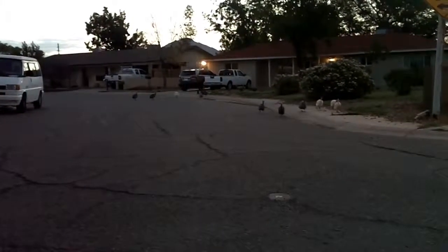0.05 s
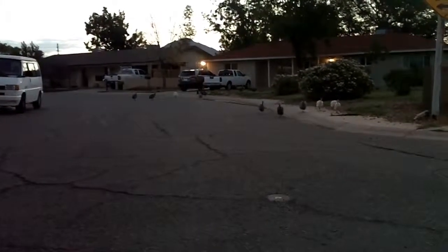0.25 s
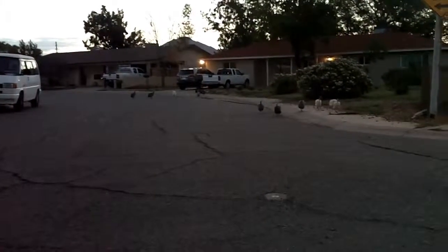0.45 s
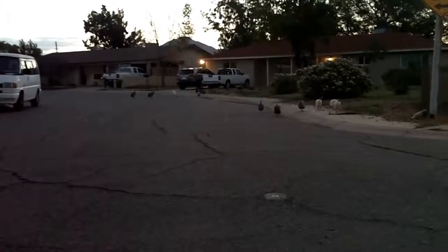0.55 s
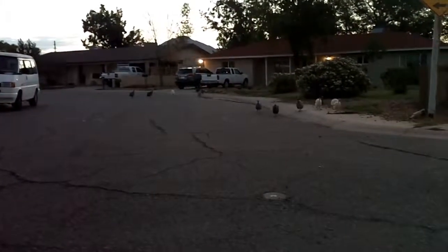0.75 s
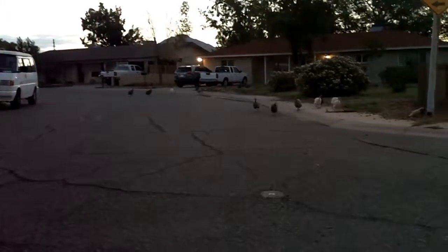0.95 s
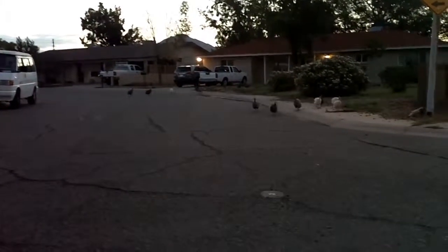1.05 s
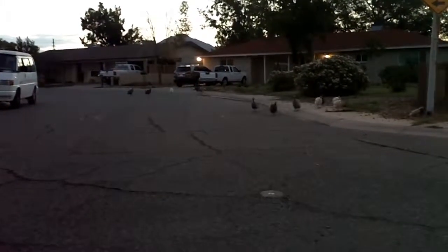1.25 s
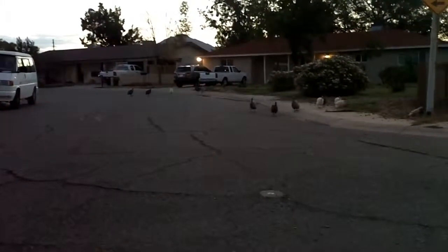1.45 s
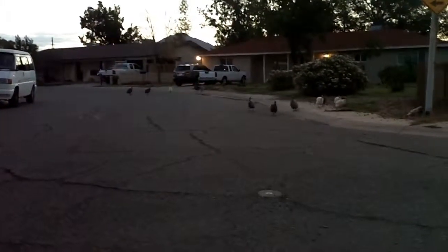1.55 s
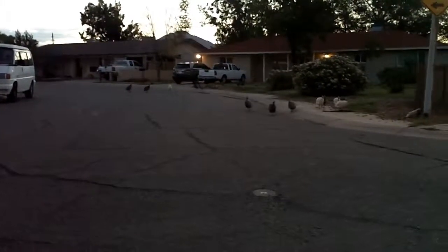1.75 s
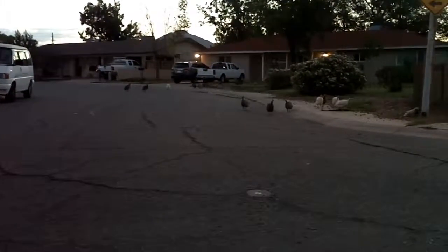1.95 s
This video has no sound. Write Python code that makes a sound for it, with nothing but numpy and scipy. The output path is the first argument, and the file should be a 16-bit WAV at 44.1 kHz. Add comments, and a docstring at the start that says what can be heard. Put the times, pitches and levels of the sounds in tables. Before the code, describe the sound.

Short, high guinea fowl peeps and thin chirps over a faint distant engine hum.

```python
"""Distant town noise and an idling engine hum along a quiet residential street.
Guinea fowl give short high peeps with a strong third harmonic and a raspy onset.
Thin chirps and one hoarse rattle slide between the peeps; house fronts throw back a faint echo.
Air rumbles on the microphone, with a brief high rustle at the start and a few handling knocks later."""
import sys
import numpy as np
from scipy import signal
from scipy.fft import rfft, irfft
from scipy.io import wavfile

SR = 44100
rng = np.random.default_rng(int(sys.argv[2]) if len(sys.argv) > 2 else 0)


def transcribe(u):
    """Save the signal u as a 16-bit wav file named by the first command-line argument.

    u: samples, shape (n,) or (channels, n), limited to [-1, 1]; the rate is SR.
    q: integer samples, one column per channel.
    """
    v = np.clip(np.atleast_2d(u).T, -1, 1)
    q = np.round(v * 32767).astype(np.int16)
    wavfile.write(sys.argv[1], SR, q)


N = 88420


def undb(db):
    return 10 ** (np.asarray(db) / 20)


def wander(cutoff_hz):
    """Smooth random drift, rms 1."""
    rolloff = np.sqrt(1 + (np.fft.rfftfreq(N, 1 / SR) / cutoff_hz) ** 6)
    drift = irfft(rfft(rng.standard_normal(N)) / rolloff, N)
    return drift / drift.std()


def noise(spectrum):
    """Noise shaped by (f/Hz, relative density/dB) points, rms 1."""
    hz, db = np.array(spectrum, float).T
    gain = undb(np.interp(np.log(np.fft.rfftfreq(N, 1 / SR) + 1), np.log(hz), db))
    shaped = irfft(rfft(rng.standard_normal(N)) * gain, N)
    return shaped / shaped.std()


def ramp(u):
    """Smooth step from 0 to 1."""
    return np.sin(np.pi / 2 * np.clip(u, 0, 1)) ** 2


def phase_of(hz):
    return 2 * np.pi * np.cumsum(hz) / SR


# town spectrum: f/Hz, relative density/dB
TOWN_SPECTRUM = [(24, 3.5), (60, -1.5), (110, -2), (200, -3), (300, -12.5), (450, -14.5), (620, -15.5),
                 (800, -23.5), (950, -14), (1060, -21), (1170, -16), (1420, -26), (1670, -21.5),
                 (1970, -29), (2250, -23.5), (2720, -42), (3000, -28.5), (3450, -22), (4200, -22.5),
                 (4850, -26.5), (5500, -40), (6200, -42.5), (7000, -46), (7800, -59), (8900, -48.5),
                 (10300, -52), (12000, -58)]


def town(level_db=-42.5, waver_db=0.5):
    """Far town noise, nearly steady."""
    return noise(TOWN_SPECTRUM) * undb(level_db + waver_db * wander(6.3))


# engine harmonics: multiple of firing rate, rms level/dB
ENGINE_HARMONICS = [(1, -45), (2, -49.5), (3, -54), (4, -63), (5, -60.5)]


def engine(firing_hz=47.12, waver=0.0045):
    """A distant idling engine hums at multiples of its firing rate."""
    phase = phase_of(firing_hz * (1 + waver * wander(2.9)))
    return sum(np.sqrt(2) * undb(db) * np.sin(round(k) * phase + rng.uniform(0, 2 * np.pi))
               for k, db in ENGINE_HARMONICS)


# air spectrum: f/Hz, relative density/dB
AIR_SPECTRUM = [(15, -12.5), (35, 0), (100, -4), (200, -8), (350, -16.5), (700, -23.5), (1400, -32.5),
                (2700, -47), (6000, -71.5)]
# gust envelope: t/s, level/dB
GUST_LEVELS = [(0, -53), (1.05, -51), (1.2, -39.5), (1.29, -40), (1.34, -37), (1.46, -41.5), (1.56, -50.5),
               (1.7, -43.5), (2.0, -66)]


def air(t):
    """Gusts rumble on the microphone."""
    times_s, levels_db = np.array(GUST_LEVELS).T
    return noise(AIR_SPECTRUM) * undb(np.interp(t, times_s, levels_db))


# rustle spectrum: f/Hz, relative density/dB
RUSTLE_SPECTRUM = [(5000, -17), (7900, -12), (8900, 5), (10300, -1), (11600, -19), (12500, -27)]


def rustle(t, level_db=-66.5, end_s=0.085, fade_s=0.098):
    """A faint high rustle that fades at once."""
    return undb(level_db) * noise(RUSTLE_SPECTRUM) * ramp((end_s - t) / fade_s)


# tick and scuff spectra: f/Hz, relative density/dB
TICK_SPECTRUM = [(300, -13), (1500, 1), (2700, -1), (4500, 10), (6200, -5), (7800, -11), (9000, -5.5),
                 (10200, -9), (11200, -24)]
SCUFF_SPECTRUM = [(100, -15), (180, 6), (360, 15), (550, -28), (1200, -42.5)]
# handling knocks: t/s, tick level/dB, thud f/Hz, thud level/dB
HANDLING_KNOCKS = [(1.453, -51, 94, -31), (1.5, -58, 99, -59), (1.540, -53.5, 111, -53),
                   (1.626, -52.5, 200, -31.5)]


def knocks(t, tick_decay_s=0.009, scuff_decay_s=0.02, scuff_re_thud_db=-10.5, thud_peak_s=0.0106):
    """Each knock on the microphone gives a tick, a dull scuff and a soft thud."""
    out, tick, scuff = np.zeros(N), noise(TICK_SPECTRUM), noise(SCUFF_SPECTRUM)
    for start_s, tick_db, thud_hz, thud_db in HANDLING_KNOCKS:
        age_s = np.maximum(t - start_s, 0)
        tick_env = ramp(age_s / 0.00081) * np.exp(-age_s / tick_decay_s)
        scuff_env = ramp(age_s / 0.0048) * np.exp(-age_s / scuff_decay_s)
        thud_env = (age_s / thud_peak_s * np.exp(1 - age_s / thud_peak_s)) ** 2
        out += undb(tick_db) * tick_env * tick
        out += undb(thud_db + scuff_re_thud_db) * scuff_env * scuff
        out += undb(thud_db) * thud_env * np.sin(2 * np.pi * thud_hz * age_s)
    return out


# house-front reflections: delay/s, gain/dB
REFLECTIONS = [(0.023, -28), (0.040, -27.5), (0.059, -32), (0.104, -31.5)]


def street_echo(direct, t, t60_s=0.8, tail_db=-22, blur_hz=160, flicker_db=2):
    """House fronts return a few reflections and a thin diffuse tail, broken and blurred."""
    response = rng.standard_normal(N) * np.exp(-np.log(1000) * t / t60_s) * ramp(t / 0.0042)
    response *= undb(tail_db) / np.linalg.norm(response)
    for delay_s, db in REFLECTIONS:
        response[int(delay_s * SR)] += undb(db)
    echo = signal.fftconvolve(direct, response)[:N]
    blur = 0.35 * (wander(blur_hz) + 1j * wander(blur_hz))
    modulation = (1 + blur) * undb(flicker_db * wander(70))
    modulation /= np.sqrt(np.mean(np.abs(modulation) ** 2))
    return (signal.hilbert(echo) * modulation).real


def rattle(t, start_s=1.056, end_s=1.119, pulse_hz=112, first_hz=4080, last_hz=3495):
    """A distant bird's hoarse run of pulses, sinking in pitch as it grows."""
    level_db, rise_db, jitter = -47, 2.5, 0.06
    age_s, left_s = t - start_s, end_s - t
    progress = np.clip(age_s / (end_s - start_s), 0, 1)
    hz = (first_hz + (last_hz - first_hz) * progress) * (1 + jitter * wander(930))
    gate = ramp(age_s / 0.005) * ramp(left_s / 0.0032)
    pulses = gate * np.abs(np.sin(np.pi * pulse_hz * left_s))
    return undb(level_db + rise_db * progress) * pulses * np.sqrt(2) * np.sin(phase_of(hz))


# bird chirps: t/s, length/s, first f/Hz, middle f/Hz, last f/Hz, level/dB, hoarseness 0-1
BIRD_CHIRPS = [ (0.244, 0.022, 4650, 4940, 4650, -44, 0.4), (0.2527, 0.011, 4700, 4440, 3280, -34, 0.3),
               (0.255, 0.013, 3350, 3324, 3180, -38.5, 0.2), (0.317, 0.018, 3420, 3280, 3180, -48.5, 0.37),
               (0.433, 0.02, 4450, 4850, 4750, -47, 0.54), (0.524, 0.0074, 5840, 6060, 6160, -54.5, 0.2),
               (0.53, 0.032, 4170, 4680, 3600, -42, 0.27), (0.577, 0.028, 4550, 4450, 3830, -50.5, 0.2),
               (0.594, 0.077, 3200, 3080, 3080, -50, 0.17), (0.658, 0.075, 2990, 2860, 2750, -53, 0.2),
               (0.715, 0.088, 3600, 3520, 2900, -58.5, 0.15), (0.840, 0.034, 4250, 4920, 4600, -51.5, 0.25),
               (0.858, 0.048, 3750, 3600, 3400, -51.5, 0.15), (1.038, 0.033, 3600, 4280, 4550, -46, 0.5),
               (1.431, 0.024, 4530, 4210, 4220, -49, 0.5), (1.549, 0.0082, 3700, 3560, 3400, -43.5, 0.5),
               (1.586, 0.032, 4200, 4500, 4650, -50.5, 0.38), (1.615, 0.052, 4500, 4380, 4720, -49, 0.65),
               (1.768, 0.020, 4130, 3630, 2850, -49, 0), (1.784, 0.051, 2930, 2780, 2810, -55, 0.08),
               (1.812, 0.090, 3430, 3230, 3020, -55.5, 0.14), (1.951, 0.020, 4600, 4550, 3230, -38, 0.34), ]


def chirps(t, waver_depth=0.011, flicker_db=0.5, fray_hz=410):
    """Thin quavering whistles, each on one arc; hoarse ones fray into a band around their pitch."""
    out = np.zeros(N)
    waver = 1 + waver_depth * wander(470)
    flicker = undb(flicker_db * wander(98))
    fray = (wander(fray_hz) + 1j * wander(fray_hz)) / np.sqrt(2)
    for start_s, length_s, first_hz, middle_hz, last_hz, db, hoarse in BIRD_CHIRPS:
        progress = np.clip((t - start_s) / length_s, 0, 1)
        arch = 1 - (2 * progress - 1) ** 2
        bend_hz = middle_hz - (first_hz + last_hz) / 2
        hz = first_hz + (last_hz - first_hz) * progress + bend_hz * arch
        voice = (1 - hoarse + hoarse * fray) / np.hypot(1 - hoarse, hoarse)
        whistle = np.imag(voice * np.exp(1j * phase_of(hz * waver)))
        out += undb(db) * ramp(arch / 0.54) * whistle
    return out * flicker


# throat rasp: f/Hz, relative density/dB
THROAT_SPECTRUM = [(1200, -10), (2600, -8), (3300, -9), (4000, 9.5), (4800, 10.5), (5500, -30),
                   (6300, -19.5), (7800, -25.5), (9000, -20.5), (12000, -52.5)]
# peep overtones: harmonic number, level/dB re third harmonic
PEEP_OVERTONES = [(2, -28), (3, 0), (4, -24.5), (5, -43), (6, -44.5)]
# peeps: t/s, length/s, peak effort t/s, first f/Hz, last f/Hz, glide exponent, third harmonic level/dB,
# fundamental level/dB, roughness 0-1, flutter f/Hz, flutter depth, onset overshoot/fraction of pitch
FOWL_PEEPS = [ (0.260, 0.0212, 0.2713, 1669, 1471, 0.75, -22, -34, 0.19, 650, 0.12, 0.0296),
              (0.658, 0.019, 0.6668, 1510, 1292, 0.65, -29.5, -43, 0.22, 500, 0.15, 0.06),
              (1.12, 0.017, 1.128, 1450, 1253, 0.8, -37.5, -49, 0.17, 699, 0.43, 0.1),
              (1.2365, 0.035, 1.2615, 1486, 1336, 4.55, -21.5, -35.5, 0.08, 560, 0.08, 0),
              (1.559, 0.022, 1.570, 1410, 1339, 1.13, -35.5, -49, 0.22, 659, 0.82, 0.0415),
              (1.9263, 0.023, 1.937, 1484, 1485, 1.3, -16.5, -34.5, 0.07, 496, 0.14, 0.12),
              (1.989, 0.032, 2.000, 1520, 1484, 1.5, -44, -42.5, 0.54, 546, 0.27, 0.05), ]


def guinea_fowl(t, attack_s=0.0053, release_s=0.0042, swell_s=0.0066, rasp_hz=775):
    """Falling peeps: effort swells the overtones, a second vibration adds side tones, the onset rasps."""
    rough_decay_s, overshoot_s = 0.014, 0.0038
    out, breath = np.zeros(N), noise(THROAT_SPECTRUM)
    shimmer, jitter = wander(rasp_hz), wander(rasp_hz)
    for (start_s, length_s, peak_s, first_hz, last_hz, exponent, third_db, fundamental_db,
         roughness, flutter_hz, flutter_depth, overshoot) in FOWL_PEEPS:
        age_s = t - start_s
        progress = np.clip(age_s / length_s, 0, 1)
        hz = first_hz + (last_hz - first_hz) * progress ** exponent
        hz *= 1 + overshoot * np.exp(-(age_s / overshoot_s) ** 2)
        rasp = 1.96 * roughness * np.exp(-np.maximum(age_s, 0) / rough_decay_s)
        flutter = flutter_depth * progress * np.sin(2 * np.pi * flutter_hz * age_s + 0.23 * jitter)
        phase = phase_of(hz) + rasp * jitter / np.pi + 0.4 * flutter
        gate = ramp(age_s / attack_s) * ramp((length_s - age_s) / release_s)
        effort = 0.4 + 0.6 * np.exp(-((t - peak_s) / swell_s) ** 2)
        overtones = sum(undb(db) * np.sin(round(k) * phase) for k, db in PEEP_OVERTONES)
        voice = overtones * (1 + flutter + 0.5 * rasp * shimmer) + rasp * breath
        out += gate * undb(third_db) * effort * voice
        out += gate * undb(fundamental_db) * np.sqrt(effort) * np.sin(phase)
    return out


def scene():
    """Birds and their echo over town, engine and microphone noise; mono."""
    t = np.arange(N) / SR
    birds = guinea_fowl(t) + chirps(t) + rattle(t)
    street = birds + street_echo(birds, t) + engine() + town()
    return (street + air(t) + knocks(t) + rustle(t))[None]


# microphone response dips: f/Hz, 1/e half-width/Hz, gain/dB
MIC_DIPS = [(2735, 62, -14.5), (5457, 334, -9.5), (7760, 550, -5.5), (10860, 260, -14.5)]


def record(dry, lowpass_hz=12000):
    """The microphone has a few narrow dips; the recorder cuts the top."""
    bins_hz = np.fft.rfftfreq(2 * N, 1 / SR)
    response_db = sum(db * np.exp(-((bins_hz - hz) / width_hz) ** 2) for hz, width_hz, db in MIC_DIPS)
    heard = irfft(rfft(dry, 2 * N) * undb(response_db), 2 * N)[:, :N]
    return signal.sosfilt(signal.ellip(8, 0.2, 70, lowpass_hz, fs=SR, output="sos"), heard)


dry = scene()
out = record(dry)
transcribe(out)
```